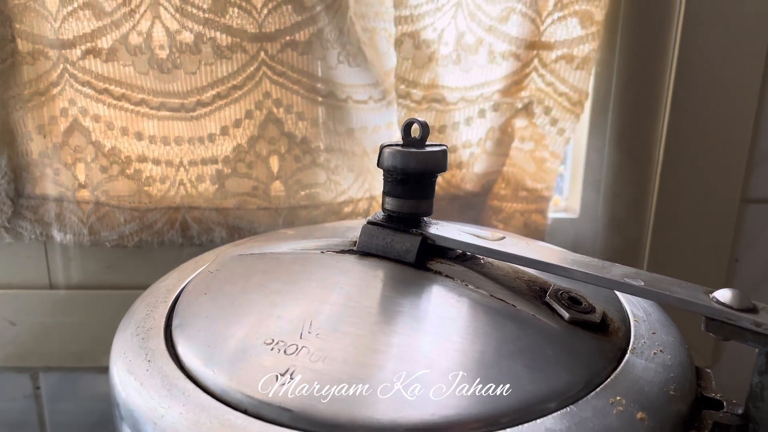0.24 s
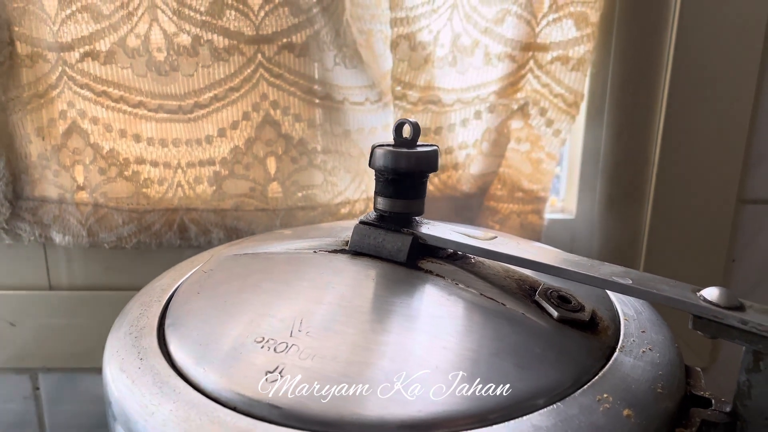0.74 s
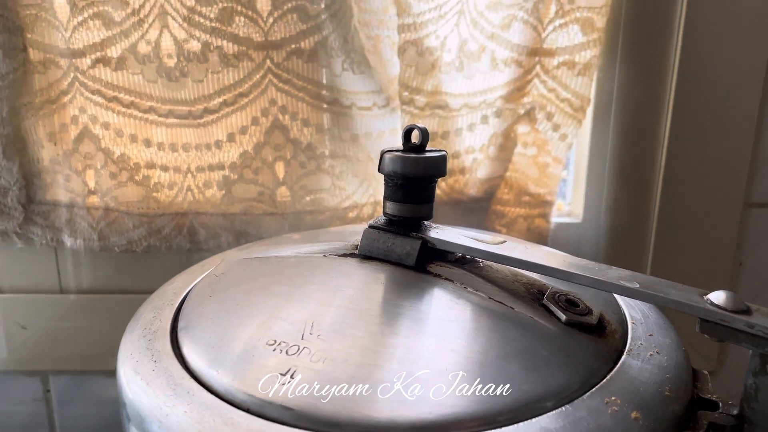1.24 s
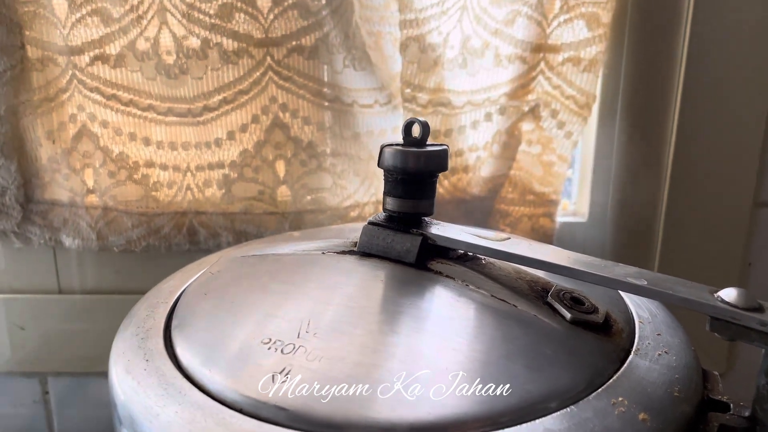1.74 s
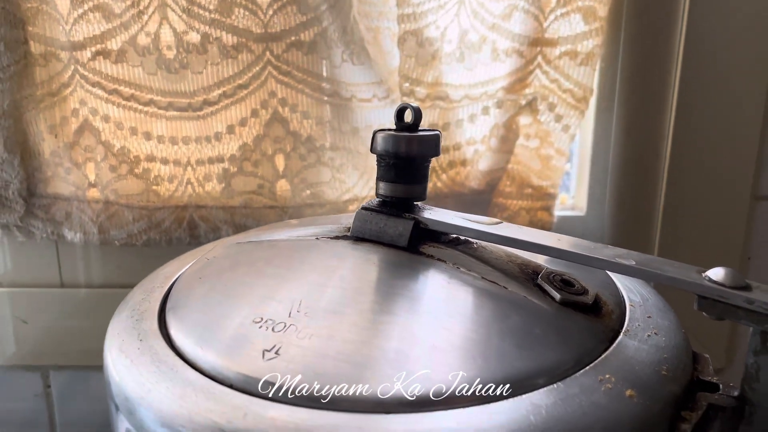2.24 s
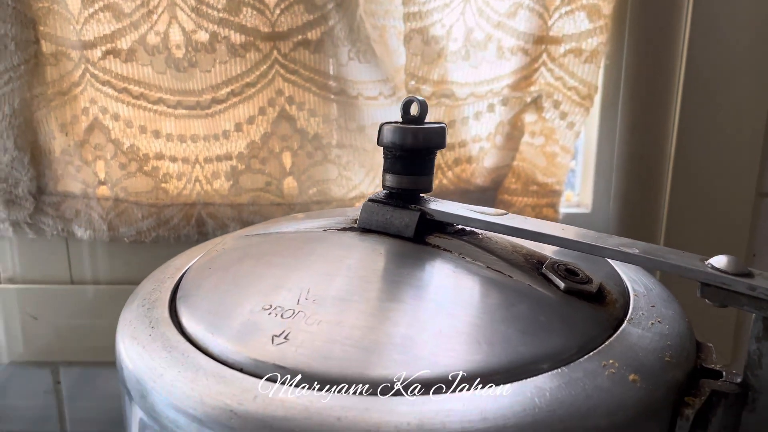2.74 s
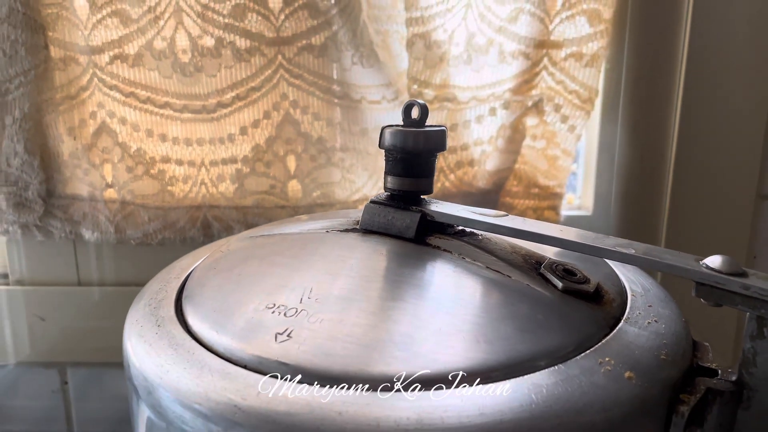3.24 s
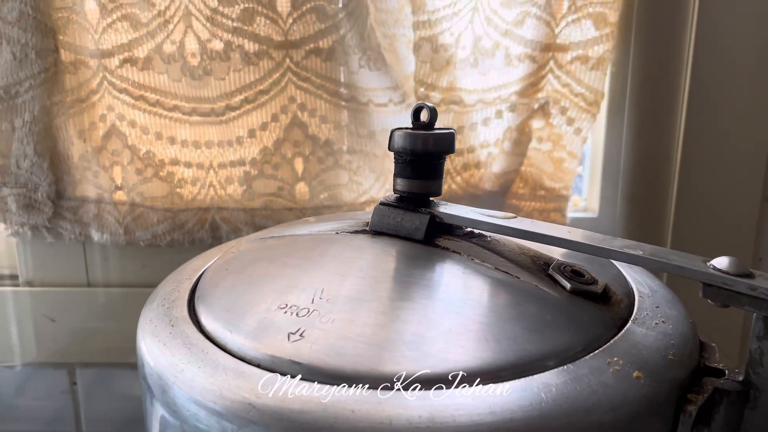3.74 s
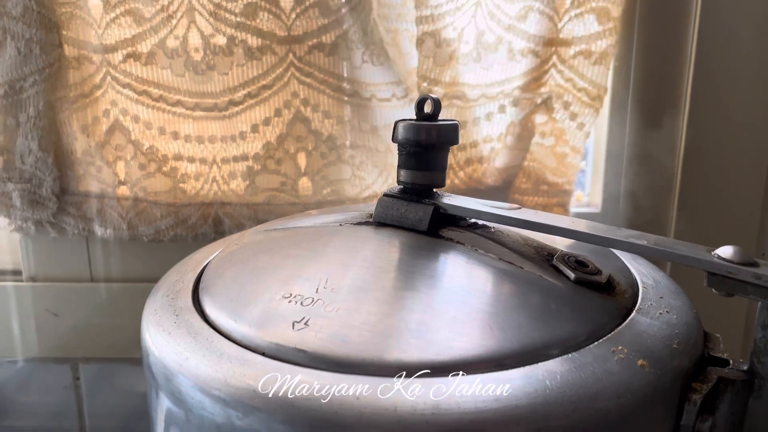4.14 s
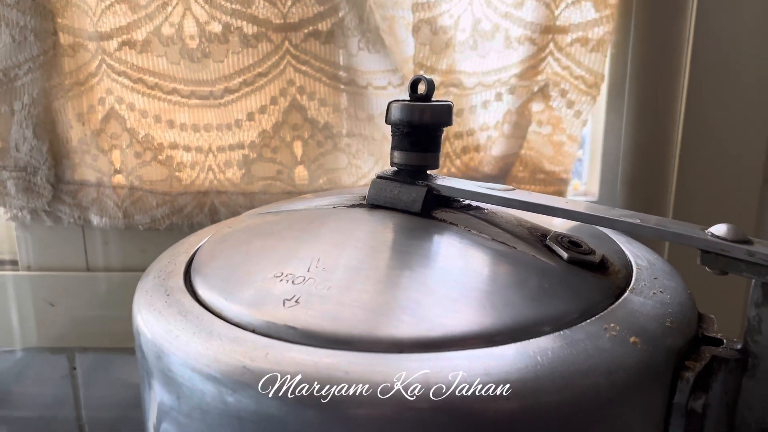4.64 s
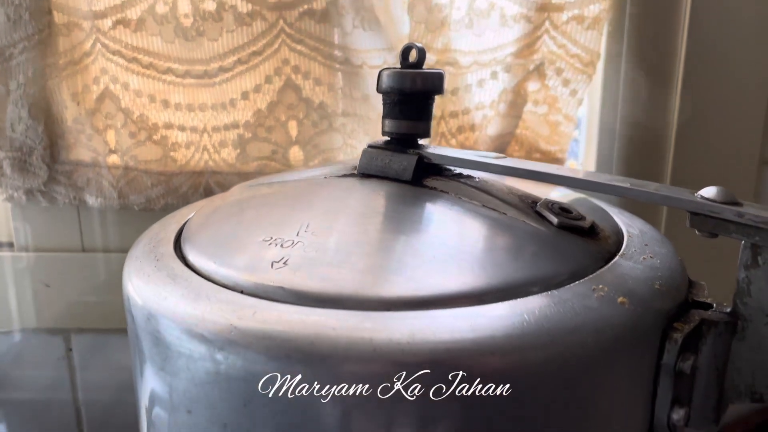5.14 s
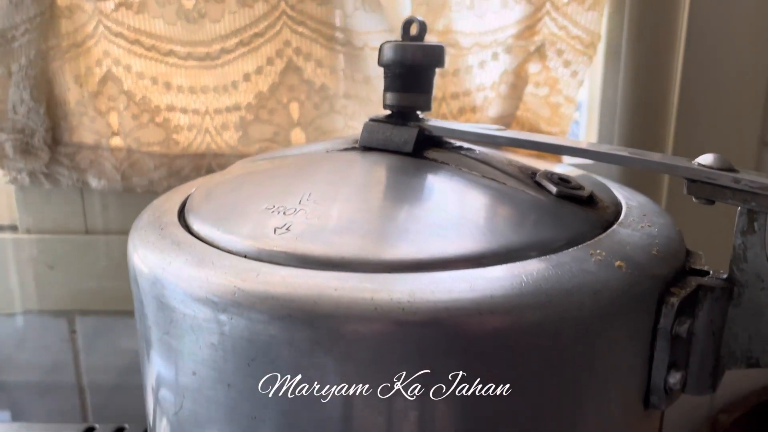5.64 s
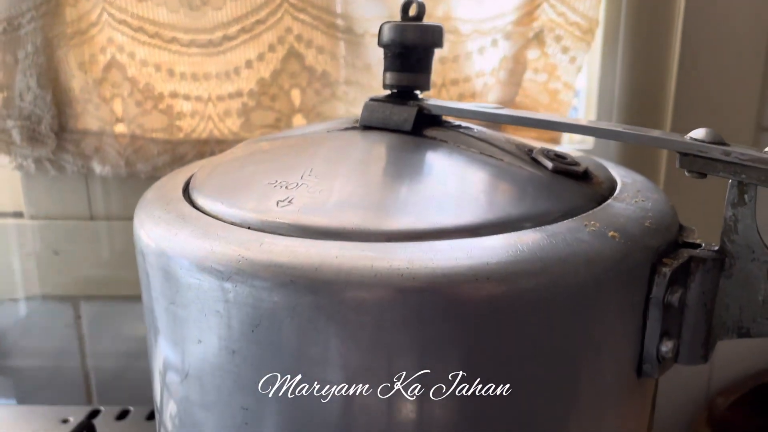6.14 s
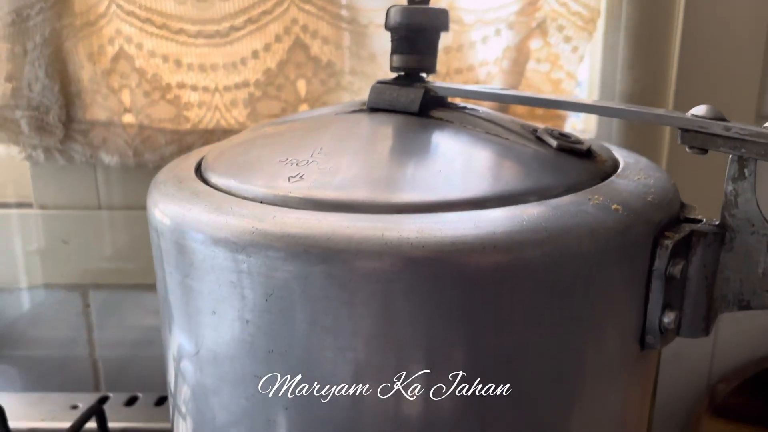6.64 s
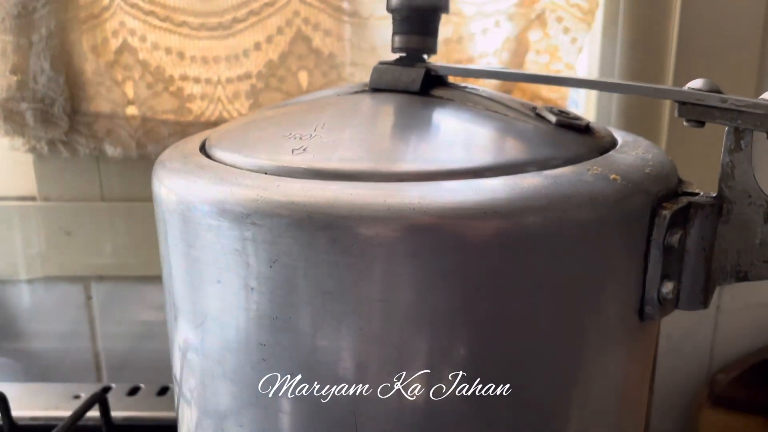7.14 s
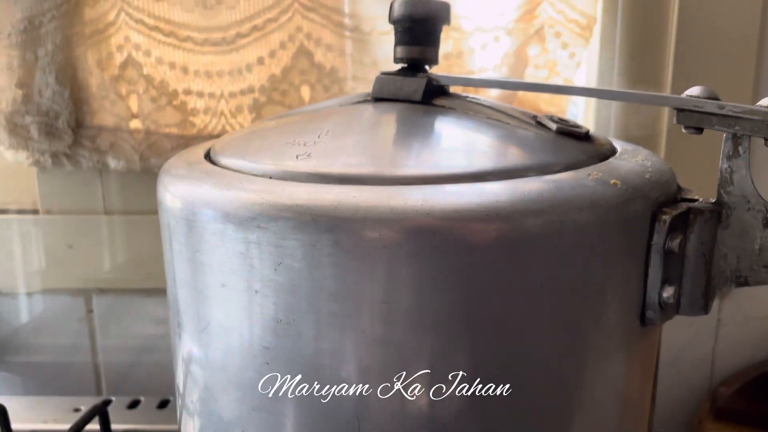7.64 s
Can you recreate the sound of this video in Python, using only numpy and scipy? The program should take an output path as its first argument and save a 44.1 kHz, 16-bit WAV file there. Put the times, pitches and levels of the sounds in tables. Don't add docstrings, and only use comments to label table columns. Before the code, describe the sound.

Pressurized steam hisses steadily and brightly from a cooker's weighted valve, over a soft low gas-flame roar in a small kitchen.

```python
import sys
import numpy as np
from scipy import signal
from scipy.fft import rfft, irfft, next_fast_len
from scipy.io import wavfile
from scipy.ndimage import uniform_filter1d

SR = 44100
rng = np.random.default_rng(int(sys.argv[2]) if len(sys.argv) > 2 else 0)


def digitize_waveform(pressure):
    field = np.atleast_2d(pressure).T
    bounded = np.clip(field, -1, 1)
    quanta = np.round(bounded * 32767).astype(np.int16)
    wavfile.write(sys.argv[1], SR, quanta)


def rack_gain(trim_db):
    fader = np.asarray(trim_db, float)
    return 10 ** (fader / 20)


N = 347949
FRAME = 2048
HZ = np.arange(FRAME // 2 + 1)[:, None] * SR / FRAME + 1e-3


def columns(rows, at, scale=lambda v: v):
    first, *rest = np.transpose(rows)
    return [np.interp(scale(at), scale(first), column) for column in rest]


def drift(rate):
    r = np.exp(-80 * np.pi * rate / SR)
    noise = rng.standard_normal(N // 40 + 2002)
    slow = signal.lfilter([1], [1, -2 * r, r * r], noise)[2000:]
    return np.interp(np.arange(N) / 40, np.arange(len(slow)), slow / slow.std())


def patches(shape, bins, frames):
    field = uniform_filter1d(rng.standard_normal(shape), size=bins, axis=0)
    field = uniform_filter1d(field, size=frames, axis=1)
    return field / field.std()


def bump(hz, width_hz, at=HZ):
    return 1 / (1 + (2 * (at - hz) / width_hz) ** 2)


def levelled(colour, db):
    return colour * rack_gain(db) / np.sqrt(np.mean(np.abs(colour) ** 2, axis=0))


def framed(x):
    return signal.stft(x, SR, nperseg=FRAME, noverlap=FRAME * 3 // 4)[1:]


# time_s, height (0 above the lid, 1 beside the pot), tilt (share of full)
HAND = [(0, 0, .04), (.9, 0, -0.041), (1.25, 0, 0.22), (2.1, 0, .52), (2.8, 0, .16), (4.25, 0.018, -0.22),
        (4.8, 0.12, 0.36), (5.7, .38, .14), (6.05, 0.51, 0.58), (6.5, 0.66, 0.69), (6.9, 1, .9),
        (7.2, .99, .99), (7.9, .92, .99)]


def hand(at_s):
    height, tilt = columns(HAND, at_s)
    return np.clip(height, 0, 1), tilt


# pitch_hz, above_lid_db_per_hz, beside_pot_db_per_hz
JET = [(1200, -21.1, -21.1), (2400, -17.5, -17.5), (3300, -16.5, -17.5), (4400, -10.2, -12.5),
       (5400, -12.5, -10.2), (6300, -11.5, -8.2), (7000, -5.6, -4.6), (8200, -3.5, -2.5), (9500, -6, -2.5),
       (11000, -3.6, -2.6), (11600, -3.6, -5.6), (11900, -9.6, -8.1), (13000, -11.2, -14.2),
       (14400, -13.5, -15), (15700, -13.5, -14.5)]


def jet_db(height):
    above_db, beside_db = columns(JET, HZ, np.log)
    bass_cut_db = 12 * np.maximum(np.log2(JET[0][0] / HZ), 0)
    return above_db + height * (beside_db - above_db) - bass_cut_db


# pitch_hz, width_hz, above_lid_db, beside_pot_db
VENT = [(1930, 77, 2.5, 5.5), (2900, 300, 2.5, .3), (3400, 150, -3, -3), (5500, 200, -2.5, -3.5),
        (5780, 350, -.5, 6), (6620, 300, 3.5, 2.5), (4660, 1050, 2.5, 1), (8150, 400, 3, 2),
        (9070, 100, 1.5, 3), (9940, 1800, 4.5, 3.5), (11420, 150, 5.5, 1.5), (12500, 340, 4.5, 5),
        (13300, 200, 0, -5), (13750, 270, 2, 2)]


def vent_db(height):
    return sum(bump(hz, width_hz) * (above_db + height * (beside_db - above_db))
               for hz, width_hz, above_db, beside_db in VENT)


# pitch_hz, width_hz, above_lid_db, lower_down_db, full_height (share of the way down)
WHISTLE = (7350, 55, 2, 7.5, .25)


def whistle_db(height):
    hz, width_hz, above_db, lower_db, full_height = WHISTLE
    sunk = np.minimum(height / full_height, 1)
    return bump(hz, width_hz) * (above_db + sunk * (lower_db - above_db))


# above_lid_delay_ms, beside_pot_delay_ms, level_db
GLINTS = [(3.1, 3.04, -21), (5.3, 5.4, -19), (7.7, 7.5, -19)]


def glints(height):
    paths = 1
    for above_ms, beside_ms, level_db in GLINTS:
        delay_s = (above_ms + height * (beside_ms - above_ms)) / 1000
        paths = paths + rack_gain(level_db) * np.exp(-2j * np.pi * HZ * delay_s)
    return paths


# time_s, level_db
LEAK = [(0, -32.5), (.4, -31.5), (.8, -32.5), (1.2, -31.5), (1.7, -32), (2, -31.5), (2.8, -32), (3.3, -33),
        (4.1, -33), (4.4, -32), (5.2, -31), (6.2, -32), (7.2, -31), (7.9, -32.5)]


def steam():
    flutter = rack_gain(0.46 * drift(22.0))
    frame_s, frames = framed(rng.standard_normal((2, N)) * flutter)
    height, _ = hand(frame_s)
    colour_db = jet_db(height) + vent_db(height) + whistle_db(height)
    colour_db += .8 * patches(colour_db.shape, 60, 8)
    colour_db += .9 * patches(colour_db.shape, 15, 60)
    level_db = columns(LEAK, frame_s)[0]
    return frame_s, frames * levelled(rack_gain(colour_db) * glints(height), level_db)


# pitch_hz, level_db_per_hz
FLAME = [(18, -36), (30, -1), (105, -2.5), (243, -5), (395, -7.5), (467, -8), (522, -8), (1540, -16.5),
         (1860, -13), (2600, -24.5), (3380, -34), (5720, -120)]
# pitch_hz, width_hz, level_db
KITCHEN = [(50, 11, 6), (76, 10, 5.5), (99, 16, 6), (112, 8, 3), (135, 20, 4), (245, 20, -3.5),
           (296, 16, 4.5), (345, 22, 3), (395, 18, 4.5), (468, 25, -4.1), (512, 18, 3.6), (540, 20, 2.6),
           (797, 6, 8.1), (910, 130, 3.1), (1150, 50, -2.6)]


def flame():
    level_db, rumble_cut_hz = -43.39, 41
    size = next_fast_len(N)
    at_hz = np.arange(size // 2 + 1) * SR / size + 1e-3
    colour_db = columns(FLAME, at_hz, np.log)[0]
    for hz, width_hz, mode_db in KITCHEN:
        colour_db += mode_db * bump(hz, width_hz, at_hz)
    colour = rack_gain(colour_db) / (1 + (rumble_cut_hz / at_hz) ** 8)
    spectrum = rfft(rng.standard_normal((2, size))) * levelled(colour, level_db)
    roar = irfft(spectrum, size)[:, :N]
    return framed(roar * rack_gain(0.17 * drift(9.0)))[1]


# start_s, end_s, likeness_lost (share)
TURNS = [
    (2.76, 4.05, 0.22),
    (3.31, 3.9, .5),
]


def turning(at_s):
    turn_in_s, turn_out_s = .05, .12
    total = 0
    for start_s, end_s, share in TURNS:
        rise = (at_s - start_s) / turn_in_s + .5
        fall = (end_s - at_s) / turn_out_s + .5
        total = total + share * np.clip(np.minimum(rise, fall), 0, 1)
    return total


# pitch_hz, left_lead_rad, likeness (0-1), left_over_right_db
PORTS = [(40, 0, .78, 1.3), (150, .1, .8, 2.4), (330, .3, .76, 1.8), (700, .8, .55, 3.5),
         (1150, .6, .55, 1.8), (1900, .2, .86, -1.8), (2250, 1.5, .7, -1.2), (2630, 2.78, .93, -.3),
         (3150, 3.47, .93, 0), (3500, 4.7, .85, 0), (3950, 6.05, .93, -.3), (4250, 6.55, .9, -.6),
         (4450, 7.0, .8, -.8), (4850, 7.5, .72, -.8), (5250, 8.0, .65, .6), (5500, 6.45, .8, .3),
         (5590, 6.15, .8, .3), (5900, 5.5, .55, .8), (6200, 5.2, .6, 1.8), (7200, 4.4, .75, 1.6),
         (7650, 3.58, .953, .6), (8300, 3.25, .995, 0), (8950, 3.05, .995, 0), (9600, 2.63, .953, 0),
         (9900, 2.2, .85, -.2), (11500, 1.3, .85, 0), (12100, .4, .9, 0), (13100, 0, .96, 0)]
# rest_hz, added by sinking_hz, full_tilt_hz, full_turn_hz
OUT_OF_STEP_HZ = (2215, 230, 5, -60)
BACK_IN_STEP_HZ = (3280, 5, 780, -850)
PARTING_HZ = (4590, 5, 720, 270)
# pitch_hz, width_hz, above_lid_rad, beside_pot_rad
HIGH_LEAD = (9600, 900, .17, -.06)
# pitch_hz, width_hz, left_over_right_db
SHADOW = (5750, 450, -10.5)


def ports(frame_s, frames):
    height, tilt = hand(frame_s)
    sunk, turned = np.sqrt(height), turning(frame_s)
    pose = np.stack([np.ones_like(frame_s), sunk, tilt, turned])
    edges_hz = np.array([OUT_OF_STEP_HZ, BACK_IN_STEP_HZ, PARTING_HZ]) @ pose
    moved_hz = [np.zeros_like(frame_s), *edges_hz,
                np.full_like(frame_s, 6000), np.full_like(frame_s, SR / 2)]
    rest_hz = [0, 2250, 3500, 4850, 6000, SR / 2]
    slid_hz = np.stack([np.interp(HZ[:, 0], knots, rest_hz) for knots in np.transpose(moved_hz)], axis=1)
    lead_rad, alike, pan_db = columns(PORTS, slid_hz)

    tremor_rad = .11 * (1 + 1.2 * bump(2900, 2000))
    lead_rad = lead_rad + tremor_rad * patches(lead_rad.shape, 30, 5)
    hz, width_hz, above_rad, beside_rad = HIGH_LEAD
    lead_rad = lead_rad + bump(hz, width_hz) * (above_rad + sunk * (beside_rad - above_rad))
    alike = np.clip(alike * (1 - turned * bump(2600, 1100)), 0, 1)
    hz, width_hz, shadow_db = SHADOW
    pan_db = pan_db + height ** 2 * shadow_db * bump(hz, width_hz)

    shared = np.sqrt((1 + alike) / 2) * frames[0]
    apart = np.sqrt((1 - alike) / 2) * frames[1]
    left_over_mid = rack_gain(pan_db / 2) * np.exp(.5j * lead_rad)
    pair = np.stack([(shared + apart) * left_over_mid, (shared - apart) / left_over_mid])
    return signal.istft(pair, SR, nperseg=FRAME, noverlap=FRAME * 3 // 4)[1][:, :N]


def swell(start_s, length_s, pitch_hz, level_db):
    t = np.arange(N) / SR - start_s
    envelope = np.sin(np.pi * np.clip(t / length_s, 0, 1))
    return rack_gain(level_db) * envelope * np.sin(2 * np.pi * pitch_hz * t)


# start_s, length_s, pitch_hz, level_db
FAR_TONE = (.96, .25, 1455, -56)


def far_tone():
    return swell(*FAR_TONE)


# start_s, length_s, pitch_hz, level_db
BUMPS = [
    (3.733, .04, 120, -40),
    (3.74, .03, 210, -45),
    (3.738, .035, 290, -44),
    (3.738, .035, 430, -45),
    (7.74, .03, 110, -45),
]


def hand_bumps():
    return sum(swell(*row) for row in BUMPS)


def scene():
    frame_s, jet = steam()
    return ports(frame_s, jet + flame()) + far_tone() + hand_bumps()


def roll_off(x):
    return signal.sosfilt(signal.butter(12, 15750, fs=SR, output="sos"), x)


def record(dry):
    return roll_off(dry)


dry = scene()
out = record(dry)
digitize_waveform(out)
```